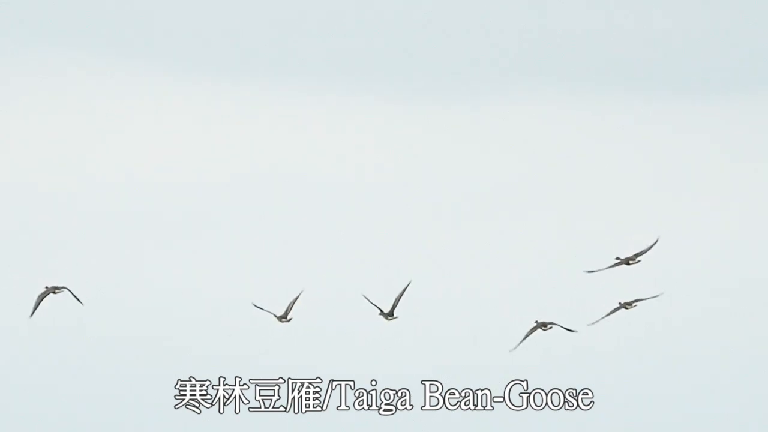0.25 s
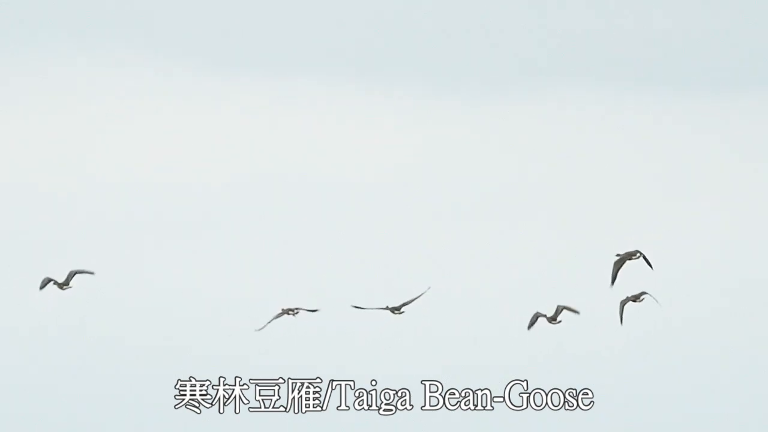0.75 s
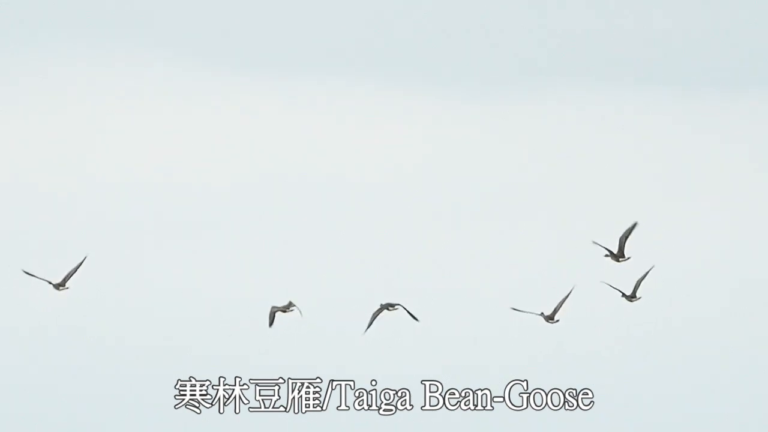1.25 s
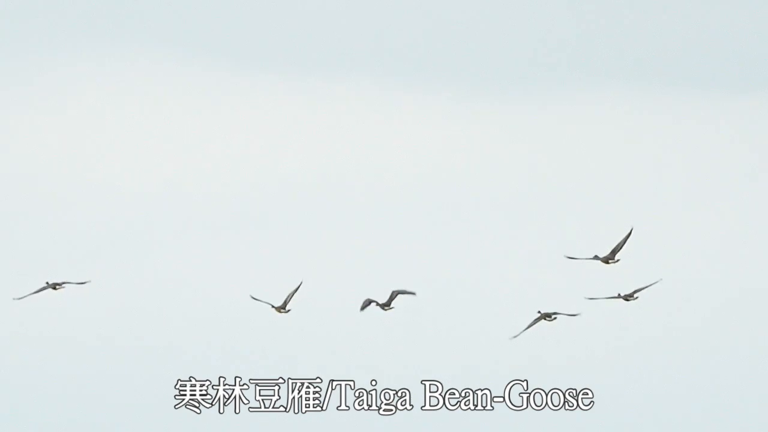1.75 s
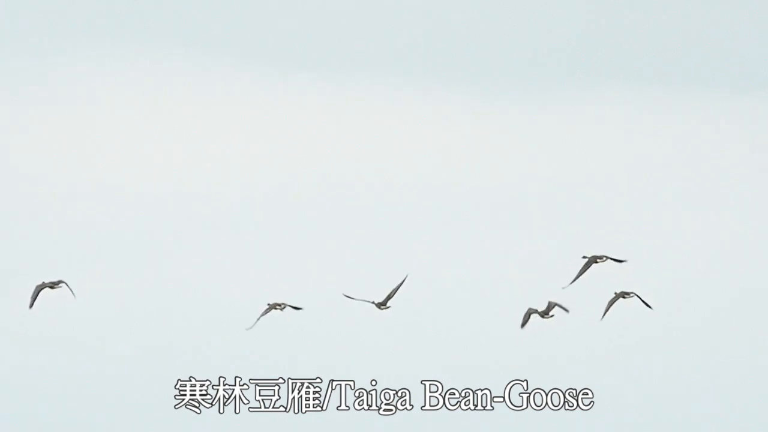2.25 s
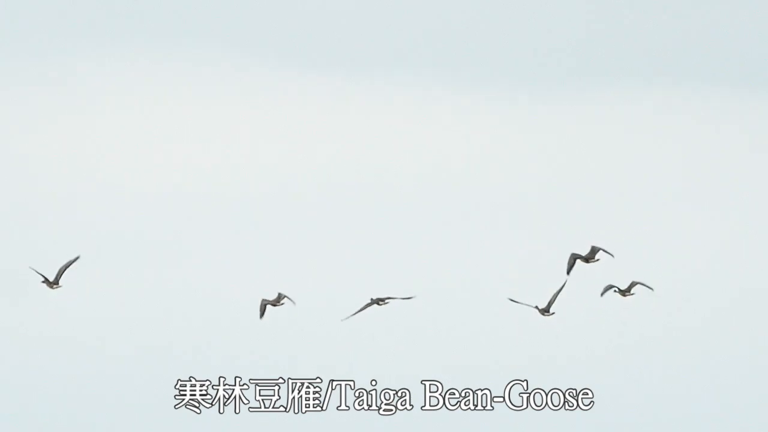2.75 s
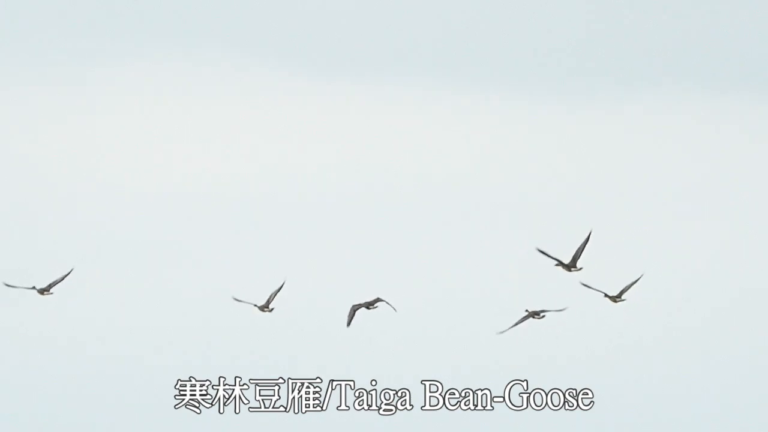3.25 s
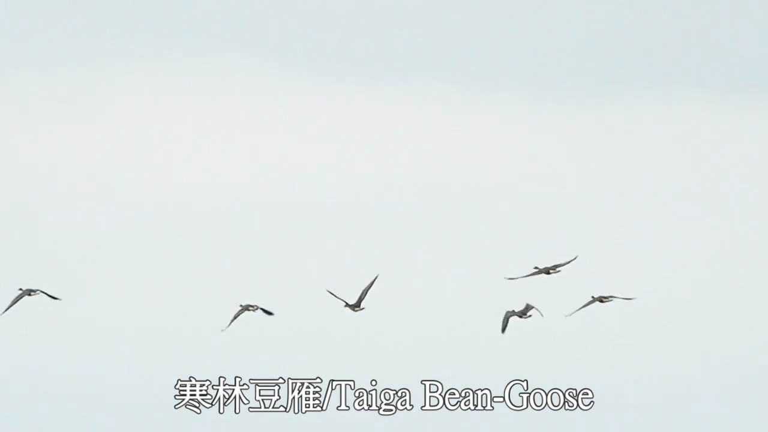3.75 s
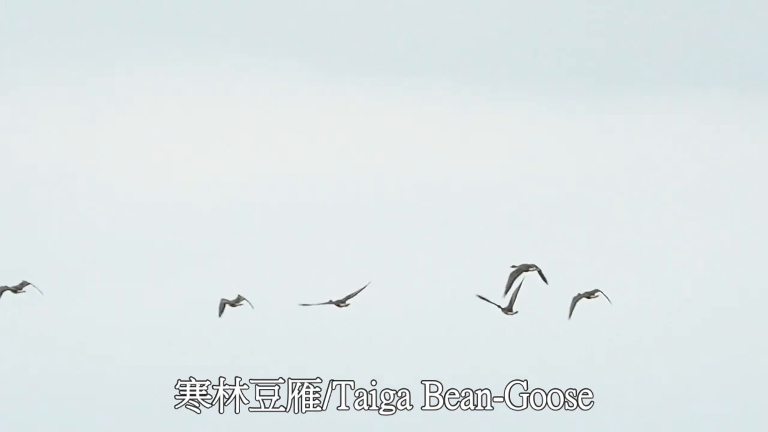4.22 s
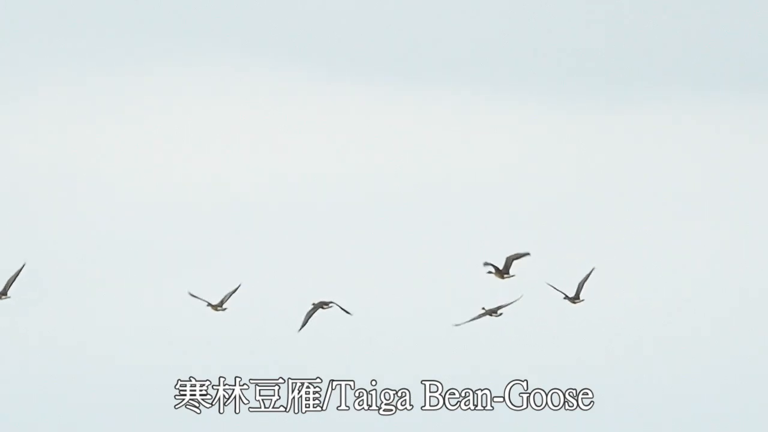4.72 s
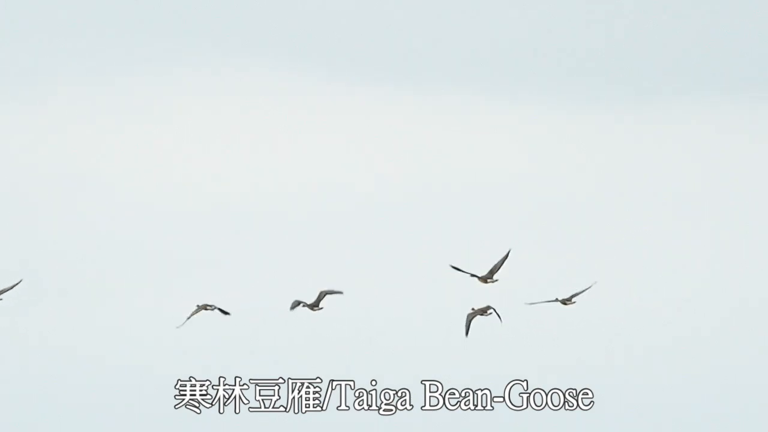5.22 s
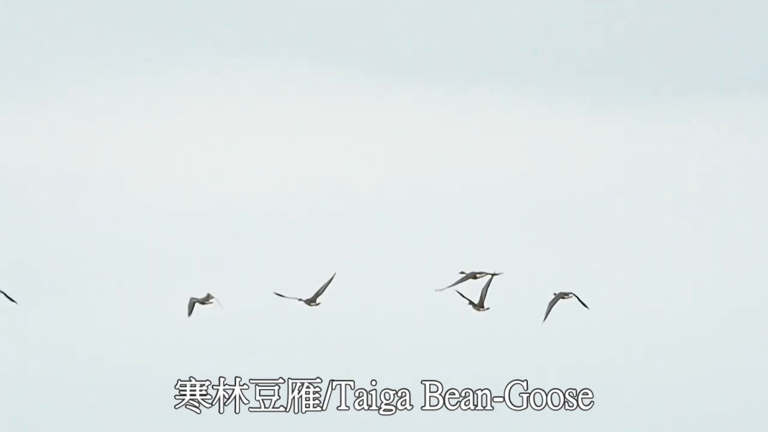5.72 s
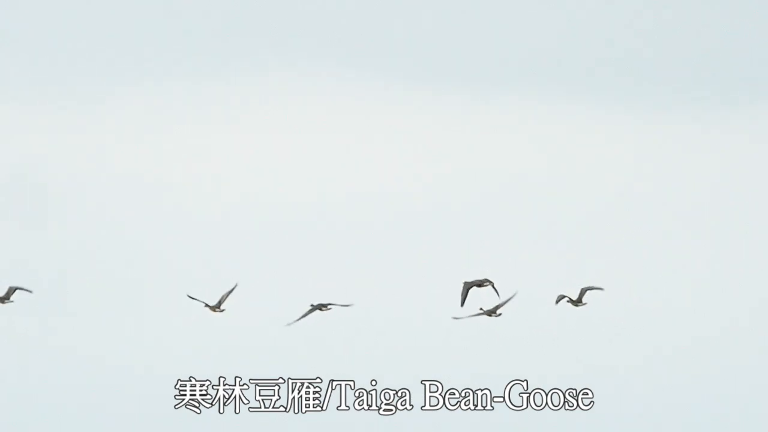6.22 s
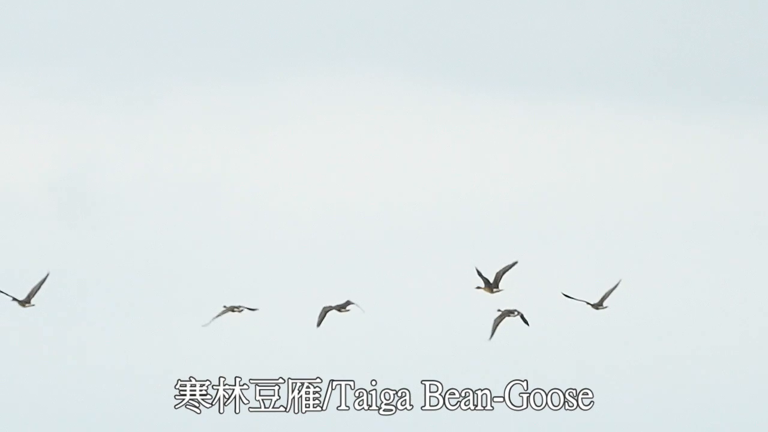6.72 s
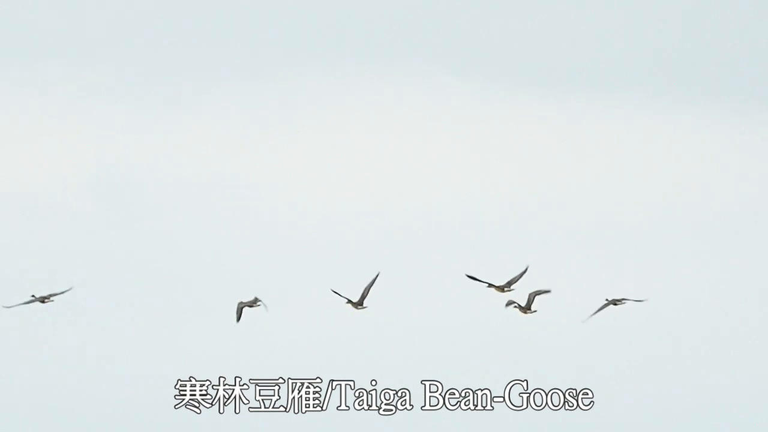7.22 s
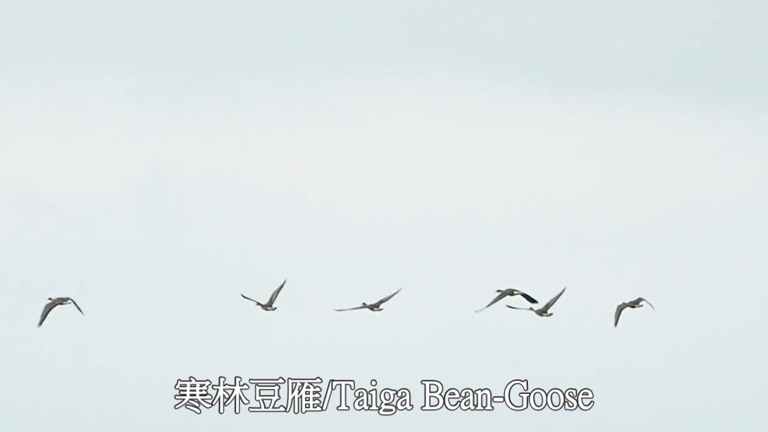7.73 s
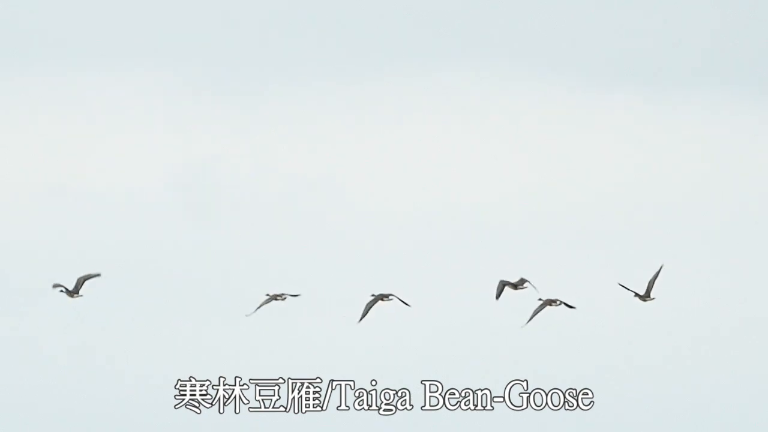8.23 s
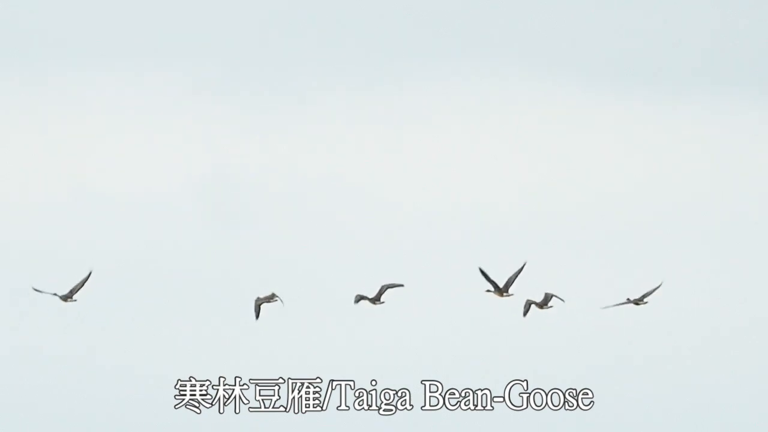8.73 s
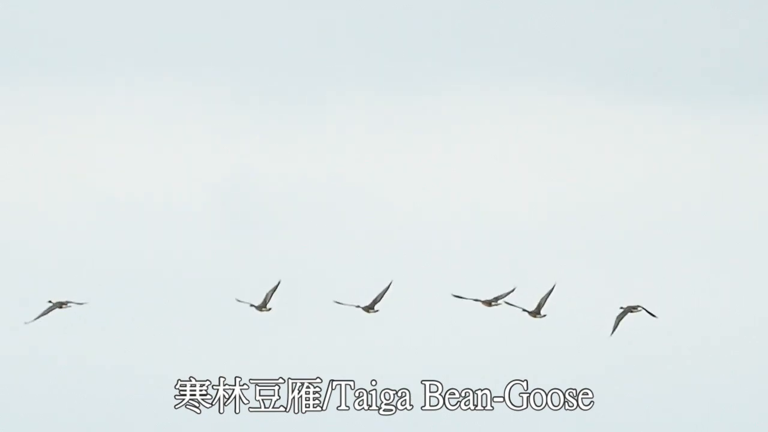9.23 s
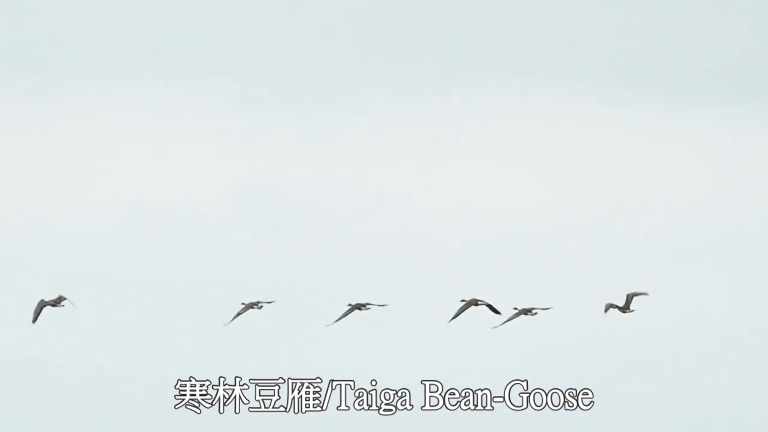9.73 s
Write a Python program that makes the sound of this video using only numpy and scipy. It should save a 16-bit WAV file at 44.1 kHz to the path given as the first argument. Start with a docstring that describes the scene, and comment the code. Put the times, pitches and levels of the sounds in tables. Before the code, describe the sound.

Short goose honks alternate and sometimes overlap, a lower voice and a higher, reedy one, both rough at the edges. Quick dry rattles of flight feathers fall between them as the birds beat their wings. The calls are loudest at first and turn thinner and weaker towards the end. The birds sit near the centre, slightly right, outdoors with very little echo and a gentle hush of air.

```python
"""Out in the open, a few geese fly past. Two call in turn, one deep, one higher and reedier.
Each honk starts as a croak of slow flaps in the syrinx (a bird's voice box), locks into a clear tone
and breaks up again as the pitch sags. Between the calls stiff flight feathers rattle on the wing
beats, over a soft hush of air."""
import sys
import numpy as np
from scipy import signal
from scipy.fft import rfft, irfft, next_fast_len
from scipy.io import wavfile
from scipy.ndimage import uniform_filter1d, map_coordinates

SR = 44100
rng = np.random.default_rng(int(sys.argv[2]) if len(sys.argv) > 2 else 0)


def wav_out(sig):
    """Save sig, one row per channel (or a flat mono array), as 16-bit PCM at SR to the path in sys.argv[1]."""
    wavfile.write(sys.argv[1], SR, np.round(np.clip(np.atleast_2d(sig).T, -1, 1) * 32767).astype(np.int16))


N = 439677
TIME = np.arange(N) / SR
CUTOFF_HZ = 15800


def deep_goose():
    """The lower voice: honks near 600 Hz that grow fainter and thinner towards the end."""
    # Each row: when the call starts, eases off, breaks up and ends in seconds, held pitch in Hz,
    # held and tail level in dB, held and tail brightness in dB, hoarseness from 0 to 1.
    calls = [(-0.03, 0.005, -0.01, 0.09, 555, -15, -20, 10, 3, .9),
             (0.718, 0.838, 0.845, 0.968, 603, -15, -21.5, 0, -5, 0),
             (1.595, 1.712, 1.712, 1.828, 603, -14.7, -22.5, 2, -1, 0),
             (2.72, 2.848, 2.848, 3.02, 609, -15, -21, 4, 3, .01),
             (3.014, 3.045, 3.02, 3.088, 590, -19, -23, 10, 1, .9),
             (3.617, 3.714, 3.714, 3.83, 600, -14, -23, 10, 4, .01),
             (4.217, 4.298, 4.296, 4.43, 605, -16, -23, 7, 5, 0),
             (4.966, 5.088, 5.09, 5.178, 610, -14.7, -22.3, 14, 10, 0),
             (5.805, 5.928, 5.928, 6.058, 600, -17.2, -26.5, 9, 5, 0),
             (6.589, 6.718, 6.725, 6.806, 615, -14.3, -26, 17, 9, .01),
             (7.388, 7.495, 7.495, 7.588, 605, -21, -33, 17, 13, 0),
             (8.196, 8.305, 8.305, 8.398, 605, -26, -38.5, 17, 15, .01),
             (9.0, 9.094, 9.09, 9.15, 612, -27, -37.5, 27, 24, .15),
             (9.744, 9.84, 9.835, 9.937, 623, -22, -32, 32, 23, 0)]
    # How the throat colours the clear tone and the croak. Each row: frequency in Hz, gain in dB.
    tone_colour = [(300, -24.5), (590, 2), (1200, -7), (1800, 0.3), (2400, -10.5), (3000, -20), (3600, -10),
                   (4200, -16.5), (4800, -26.5), (8400, -42.5), (15000, -75)]
    croak_colour = [(180, -33), (300, -17), (400, -9), (520, .5), (880, -3.5), (1120, -10), (1550, -2),
                    (1900, -5.5), (2500, -12.5), (3900, -14), (5000, -27), (6500, -40.5), (9000, -49),
                    (15000, -68.5)]
    habit = dict(onset_db=6, onset_dull_db=2, scoop=.07, scoop_s=.015, droop=.014, wander=.002,
                 arch=.016, arch_db=2, arch_bright_db=4, ease_s=.016, break_s=.022, last_pitch_hz=507)
    return goose(calls, habit, tone_colour, croak_colour, flap_hz=150, last_flap_hz=112, flap_jitter=.1,
                 flutter=.045, ring_ratio=1.5, ring_s=.002, rasp=.4,
                 tone_bright_db=-1.3, croak_bright_db=-5)


def high_goose():
    """The higher voice: honks near 980 Hz, made reedy by a stronger flutter."""
    # Each row: when the call starts, eases off, breaks up and ends in seconds, held pitch in Hz,
    # held and tail level in dB, held and tail brightness in dB, hoarseness from 0 to 1.
    calls = [(0.131, 0.238, 0.275, 0.326, 977, -9.8, -20, 8, -2, .05),
             (0.711, 0.768, 0.79, 0.91, 968, -10.3, -25, 7, 0, .06),
             (1.249, 1.312, 1.315, 1.376, 958, -11.2, -23.5, 7, -1, .15),
             (1.936, 2.05, 2.085, 2.138, 965, -13.3, -22, 6, -5, .1),
             (2.507, 2.558, 2.565, 2.628, 961, -12.8, -27.5, -2, -12, .2),
             (3.15, 3.265, 3.285, 3.342, 973, -19, -25.8, -6, -13, .03),
             (3.75, 3.828, 3.87, 3.928, 967, -16.8, -26.5, -6, -9, .03),
             (4.509, 4.612, 4.65, 4.722, 991, -15.5, -26, 5, 0, .05),
             (4.755, 4.8, 4.79, 4.81, 1110, -20.5, -31, 6, -3, .75),
             (5.327, 5.388, 5.485, 5.515, 984, -16.3, -25.5, 6, -2, .12),
             (5.93, 5.968, 5.955, 6.02, 985, -14, -21, -3, -1, .55),
             (6.371, 6.43, 6.425, 6.505, 966, -14.5, -27.5, 10, 9, .65),
             (6.962, 7.012, 7.025, 7.103, 997, -26, -39.5, 7, -3, .05),
             (7.588, 7.642, 7.66, 7.785, 990, -24, -38, 33, 44, .1),
             (8.4, 8.468, 8.49, 8.545, 1008, -32, -43.5, 27, 12, .05),
             (9.085, 9.128, 9.13, 9.193, 980, -36, -34.5, 13, 18, .6),
             (9.646, 9.7, 9.7, 9.76, 999, -27.3, -36, 23, 13, .15)]
    # How the throat colours the clear tone and the croak. Each row: frequency in Hz, gain in dB.
    tone_colour = [(200, -42), (500, -24), (960, -9.7), (1400, -5.5), (1950, -0.5), (2450, -7), (2920, -9),
                   (3400, -14), (4000, -13.5), (5000, -21), (6200, -31), (8500, -39.5), (15000, -67)]
    croak_colour = [(150, -40), (350, -24), (600, -11), (880, -8.5), (1400, -4.5), (1850, -1), (2150, 6),
                    (2600, -7.5), (4100, -12.5), (5200, -22), (6500, -32.5), (9000, -42.5), (15000, -66)]
    habit = dict(onset_db=4.5, onset_dull_db=1, scoop=.045, scoop_s=.014, droop=-.002, wander=.003,
                 arch=.01, arch_db=1.5, arch_bright_db=1, ease_s=.022, break_s=.02, last_pitch_hz=800)
    return goose(calls, habit, tone_colour, croak_colour, flap_hz=178, last_flap_hz=164, flap_jitter=.028,
                 flutter=.25, ring_ratio=1, ring_s=.0027, rasp=.3,
                 tone_bright_db=-2.4, croak_bright_db=-3.5)


def goose(calls, habit, tone_colour, croak_colour, flap_hz, last_flap_hz, flap_jitter,
          flutter, ring_ratio, ring_s, rasp, tone_bright_db, croak_bright_db):
    """One bird's honks: a fast membrane gives the tone, slow flaps chop both ends into a croak."""
    out = np.zeros(N)
    for call in calls:
        start, _, _, end = call[:4]
        first = max(int(start * SR), 0)
        t = TIME[first:int((end + .02) * SR)]
        pitch_hz, level_db, bright_db, rough = effort(t, call, **habit)
        # the flapping slows as the call runs out
        flap_rate = last_flap_hz + (flap_hz - last_flap_hz) * np.clip((end - t) / .08, 0, 1)
        jitter = flap_jitter * (.15 + rough) * drift(170, len(t))
        flaps = np.cumsum(flap_rate * (1 + jitter)) / SR - .2
        opened = np.diff(np.floor(flaps), prepend=-1) > 0
        since_flap = t - np.maximum.accumulate(np.where(opened, t, 0))
        tone = clear_tone(pitch_hz, rough, flaps, flap_rate, since_flap, flutter, tone_colour)
        croaking = croak(ring_ratio * pitch_hz, since_flap, ring_s, rasp, croak_colour)
        voice = np.sqrt(1 - rough) * tone + np.sqrt(rough) * croaking
        bright_db = bright_db + tone_bright_db * (1 - rough) + croak_bright_db * rough
        voice = evened(blown_harder(voice, bright_db))
        age = t - t[0]
        fade_in = np.sin(np.pi / 2 * np.clip(age / .0016, 0, 1)) ** 2
        weak_first_flap = 1 - .6 * np.exp(-age / .005)
        fade_out = np.exp(-np.maximum(t - end, 0) / .0043)
        out[first:first + len(t)] += voice * fade_in * weak_first_flap * fade_out * from_db(level_db)
    return out


def effort(t, call, onset_db, onset_dull_db, scoop, scoop_s, droop, wander, arch, arch_db,
           arch_bright_db, ease_s, break_s, last_pitch_hz, lock_s=.028, fade_db=5, shortest_sag_s=.06):
    """The bird pushes, holds and eases off; pitch, level, brightness and roughness follow."""
    start, eases, breaks, end, top_hz, top_db, tail_db, top_bright_db, tail_bright_db, hoarse = call
    starting = np.clip(1 - (t - start) / lock_s, 0, 1)
    held = np.clip((t - start) / (eases - start), 0, 1)
    eased = 1 - np.exp(-np.maximum(t - eases, 0) / ease_s)
    spent = np.clip((t - eases) / max(end - eases, shortest_sag_s), 0, 1)
    push = (np.sin(np.pi * held) - np.pi / 4) * (1 - eased)
    # the pitch scoops up, arches, droops and wanders, each by a small share of itself
    bend = arch * push - scoop * np.exp(-(t - start) / scoop_s) - droop * held
    held_hz = top_hz * (1 + bend + wander * drift(45, len(t)))
    pitch_hz = held_hz + (last_pitch_hz - held_hz) * spent ** .8  # sags fastest at first
    level_db = top_db + arch_db * push - onset_db * starting
    level_db += (tail_db - top_db) * eased - fade_db * spent ** 3
    bright_db = top_bright_db + arch_bright_db * push - onset_dull_db * starting
    bright_db += (tail_bright_db - top_bright_db) * eased
    not_locked = (start + lock_s - t) / .022
    breaking_up = (t - breaks) / break_s
    rough = np.max([not_locked, breaking_up, hoarse * (1 - eased)], axis=0)
    return pitch_hz, level_db, bright_db, np.clip(rough, 0, .9)


def clear_tone(pitch_hz, rough, flaps, flap_rate, since_flap, flutter, colour, waver=.0055, hiss=.19):
    """The membrane buzzes; the flaps only sway it, adding side tones around each overtone."""
    sway = flutter + .6 * rough
    wobble = (waver + .028 * rough) * drift(400, len(flaps))
    cycles = np.cumsum(pitch_hz * (1 + wobble)) / SR
    membrane = buzz(cycles + .16 * sway * np.sin(2 * np.pi * flaps), pitch_hz)
    throb = 1 + sway * (2 * np.exp(-since_flap * flap_rate * 3.3) - .7)
    breath = hiss * rng.standard_normal(len(flaps))
    return throat(evened(membrane * throb) + breath, colour)


def croak(ring_hz, since_flap, ring_s, rasp, colour, puff_s=.003):
    """Each flap starts a short ring and lets out a puff of air."""
    size = len(since_flap)
    ring_hz = ring_hz * (1 + .015 * drift(150, size))
    rings = evened(buzz((since_flap - 1 / SR) * ring_hz, ring_hz) * np.exp(-since_flap / ring_s))
    puffs = evened(rng.standard_normal(size) * np.exp(-since_flap / puff_s))
    flicker = from_db(3 * drift(150, size))
    return throat((rings + rasp * puffs) * flicker, colour)


def throat(x, colour):
    """The throat colours the voice; neck and beak are held a little differently for each call."""
    hz = np.geomspace(200, 16000, 60)
    ripple_db = np.interp(hz, [1000, 4000], [1, 2.2]) * rng.standard_normal(len(hz))
    return evened(coloured(x, np.c_[hz, at_hz(colour, hz) + ripple_db]))


def blown_harder(x, bright_db):
    """Harder blowing tips the sound from the low overtones to the high ones."""
    # How each band answers. Each row: centre in Hz, gain in dB for each dB of brightness.
    blow_tilt = [(300, -1.1), (600, -0.68), (1100, -0.35), (1900, 0.16), (3400, .5), (7000, 0.35)]
    centres, slopes = np.transpose(blow_tilt)
    hz, spectrum = np.fft.rfftfreq(2 * len(x), 1 / SR), rfft(x, 2 * len(x))
    bands = [irfft(spectrum * np.interp(hz, centres, pick))[:len(x)] for pick in np.eye(len(centres))]
    return sum(band * from_db(slope * bright_db) for band, slope in zip(bands, slopes))


def wing_rattles(gain_db, gap_s=.0207, hardest_at=.6, edge_db=7, scatter_db=.7):
    """On a wing beat a few feathers slip one after another, hardest just past mid stroke."""
    # Each row is a wing beat: first and last snap in seconds, relative peak in dB, snap pitch in Hz.
    rattles = [(0.34, 0.381, -15, 4100), (0.602, 0.665, -18, 4700), (0.887, 0.93, -14, 4850),
               (1.158, 1.201, -28, 5000), (1.412, 1.432, -25, 4200), (1.46, 1.46, -18, 4870),
               (2.2, 2.262, -15, 4200), (2.233, 2.337, -22, 2450), (2.461, 2.501, -18, 4100),
               (3.574, 3.596, -24, 3300), (4.841, 4.918, -13.5, 4700), (4.886, 4.946, -22, 2900),
               (5.107, 5.168, -15, 5000), (5.365, 5.408, -17, 4500), (5.596, 5.659, -22, 4500),
               (5.672, 5.695, -22.5, 2130), (6.12, 6.163, -24, 2500), (6.845, 6.884, -26, 4100),
               (7.865, 7.905, -35, 3600), (8.764, 8.845, -37, 3100), (8.972, 9.008, -26, 4900),
               (9.213, 9.288, -31.5, 5200), (9.465, 9.55, -32.5, 5200)]
    snaps = []
    for first, last, peak_db, hz in rattles:
        count = 1 + round((last - first) / gap_s)
        for k, start in enumerate(np.linspace(first, last, count)):
            off_centre = 2 * ((k + .5) / count - hardest_at)
            level_db = peak_db - edge_db * off_centre ** 2 + scatter_db * rng.standard_normal()
            snaps.append((int(start * SR), level_db, hz))
    out = np.zeros(N)
    for at, level_db, hz in snaps:
        snap = feather_snap(hz)
        out[at:at + len(snap)] += from_db(level_db + gain_db) * snap
    return out


def feather_snap(hz, damping=.55, scuff=.16, scuff_s=.0016, rustle=.008):
    """A feather slips off its neighbour: a sharp snap, a short scuff and a faint rustle of barbs."""
    # The colour of a snap. Each row: frequency in Hz, gain in dB.
    snap_colour = [(1000, -1), (2200, 3), (5000, 1), (9000, -11), (15000, -25)]
    t = TIME[:2048]
    push = rng.standard_normal(len(t)) * (scuff * np.exp(-t / scuff_s) + rustle * np.exp(-t / .025))
    push[0] += 1  # the snap itself
    decay = np.exp(-np.pi * damping * hz / SR)
    ring = signal.lfilter([1, -decay], [1, -2 * decay * np.cos(2 * np.pi * hz / SR), decay ** 2], push)
    snap = coloured(ring, snap_colour)
    return snap / abs(snap).max()


def outdoors(x, echo_db, echo_s):
    """The treble reaches the two ears differently; the land returns a faint echo."""
    # How much the ears differ. Each row: frequency in Hz, difference against the shared sound in dB.
    width = [(600, -38), (1100, -24), (4000, -13), (8000, -2)]
    # The birds lean to the right. Each row: frequency in Hz, left level over right in dB.
    lean = [(600, 0), (1200, -.5), (2500, -1.2), (5000, -1.6), (9000, -3)]
    hz, left_right = np.fft.rfftfreq(N, 1 / SR), np.array([[1], [-1]])
    scatter = rng.standard_normal(64) * np.exp(-np.arange(64) / 16)
    phase_turn = np.exp(1j * np.angle(rfft(scatter, N)))
    side = irfft(rfft(x) * phase_turn * from_db(at_hz(width, hz)), N) * drift(25, N)
    direct = irfft(rfft(x) * from_db(left_right * at_hz(lean, hz) / 2), N) + left_right * side
    echo = rng.standard_normal((2, SR)) * from_db(-60 * TIME[:SR] / echo_s)
    echo = coloured(echo, [(600, -15.5), (2000, 3), (5000, 9)])
    echo /= np.sqrt(np.sum(echo ** 2, axis=1, keepdims=True))
    return direct + from_db(echo_db) * signal.fftconvolve(x[None], echo, axes=1)[:, :N]


def air(hush_gain_db):
    """A low rumble and a distant hush, each swelling slowly."""
    # The colour of the air. Each row: frequency in Hz, gain in dB.
    air_colour = [(25, -4), (35, 1), (55, -6), (90, -1), (200, -8), (500, -8), (1000, -10.5), (2000, -14),
                  (2800, -19), (4000, -22), (8000, -31.5), (15000, -43.5)]
    # How alike left and right are. Each row: frequency in Hz, likeness from 0 to 1.
    likeness = [(2000, .93), (10000, 0.17)]
    # The slow swells. Each row: time in seconds, rumble level in dB, hush level in dB before its gain.
    swells = [(0.5, -53.5, -48), (2.4, -55, -47.5), (3.8, -52, -51.5), (5.6, -51.5, -53), (6.3, -48, -54),
              (7.25, -47.5, -56), (8.0, -53, -57), (8.7, -54, -60), (9.5, -55, -57.5)]
    hz = np.fft.rfftfreq(N, 1 / SR)
    alike = at_hz(likeness, hz)
    mid, side = rfft(rng.standard_normal((2, N))) * from_db(at_hz(air_colour, hz))
    both = np.sqrt(1 + alike) * mid + np.sqrt(1 - alike) * side * [[1], [-1]]
    low_share = at_hz([(300, .99), (520, .22)], hz)
    rumble, hush = irfft(both * low_share, N), irfft(both * (1 - low_share), N)
    times, rumble_db, hush_db = np.transpose(swells)
    return (rumble / rumble.std() * from_db(np.interp(TIME, times, rumble_db))
            + hush / hush.std() * from_db(np.interp(TIME, times, hush_db) + hush_gain_db))


def buzz(cycles, pitch_hz):
    """One sharp pulse a cycle, built from equally strong overtones up to the cut-off."""
    harmonics = np.arange(1, int(CUTOFF_HZ / pitch_hz.max()))
    return np.cos(2 * np.pi * np.outer(harmonics, cycles)).sum(axis=0)


def coloured(x, colour):
    """Filters a sound by (Hz, dB) points, ringing only after each push (minimum phase)."""
    size = 2 * next_fast_len(x.shape[-1] // 2 + 1024)
    gain = from_db(at_hz(colour, np.fft.rfftfreq(size, 1 / SR)))
    cepstrum = irfft(np.log(gain))
    cepstrum[1:size // 2] *= 2
    cepstrum[size // 2 + 1:] = 0
    return irfft(rfft(x, size) * np.exp(rfft(cepstrum)))[..., :x.shape[-1]]


def drift(rate, size):
    """A smooth random wobble, about 1 in size, with `rate` new values a second."""
    steps = np.arange(size) * rate / SR
    return map_coordinates(rng.standard_normal(int(steps[-1]) + 3), [steps], order=2, mode="nearest")


def evened(x):
    """Holds the average level at 1 over spans longer than a flap."""
    power = uniform_filter1d(uniform_filter1d(x * x, size=600), size=400)
    return x / np.sqrt(np.maximum(power, 1e-12))


def at_hz(points, hz):
    """Reads between (Hz, value) points, giving every octave equal room."""
    point_hz, values = np.transpose(points)
    return np.interp(np.log(np.maximum(hz, 1)), np.log(point_hz), values)


def from_db(db):
    """Turns decibels into a plain gain."""
    return 10 ** (np.asarray(db) / 20)


def scene():
    """Two voices and the wing rattles out in the open, over the air."""
    birds = deep_goose() + high_goose() + wing_rattles(gain_db=2.5)
    return outdoors(birds, echo_db=-31.5, echo_s=1.0) + air(hush_gain_db=-1.2)


def record(dry):
    """Rounds off the highest peaks and steeply cuts the very top of the treble."""
    rounded = dry / (1 + (dry / .92) ** 8) ** (1 / 8)
    return signal.sosfilt(signal.ellip(10, .1, 80, CUTOFF_HZ, fs=SR, output="sos"), rounded)


dry = scene()
out = record(dry)
wav_out(out)
```